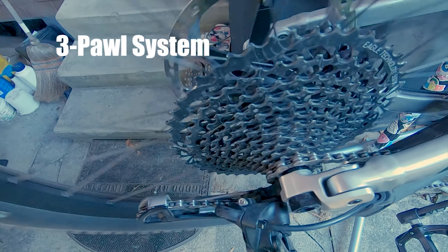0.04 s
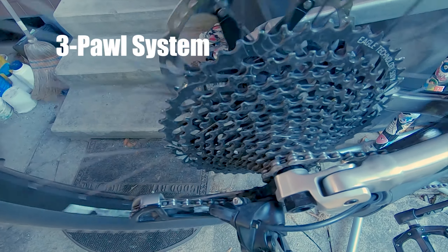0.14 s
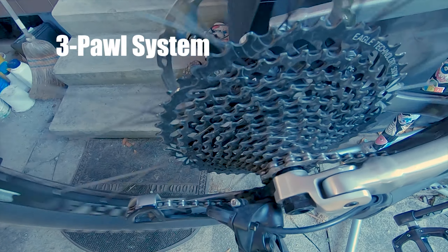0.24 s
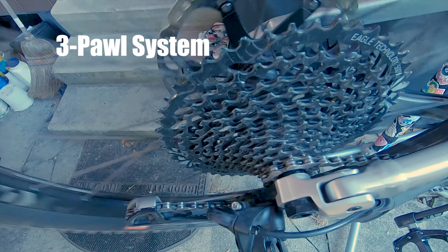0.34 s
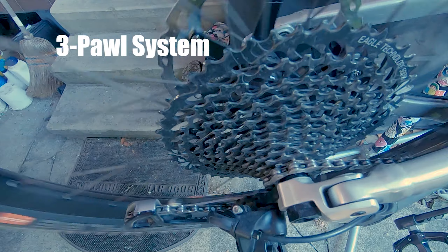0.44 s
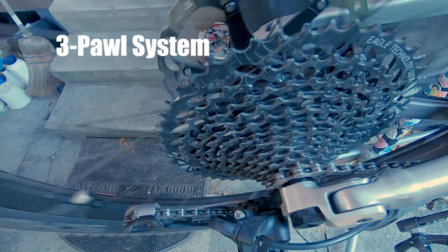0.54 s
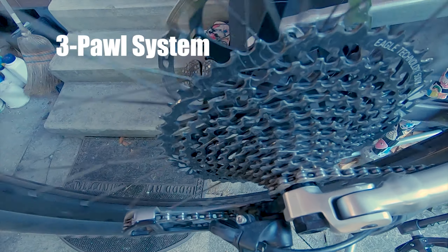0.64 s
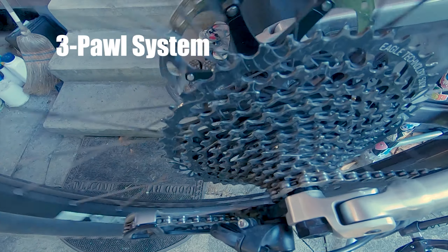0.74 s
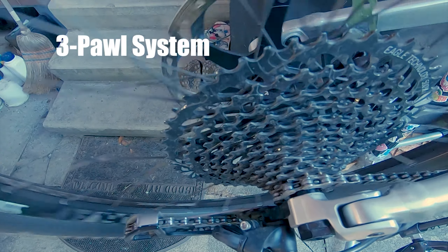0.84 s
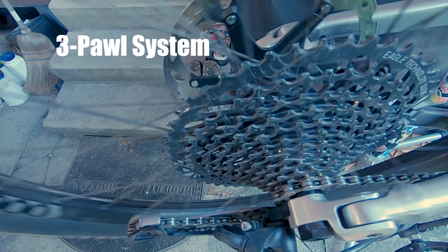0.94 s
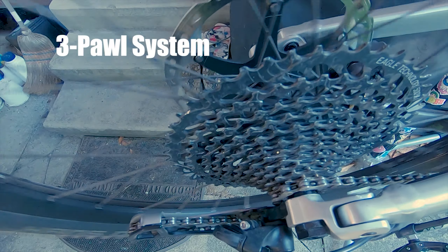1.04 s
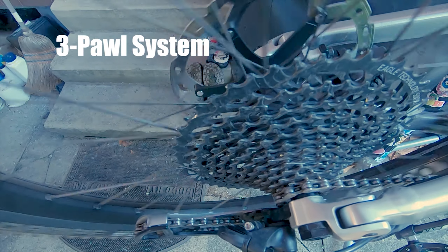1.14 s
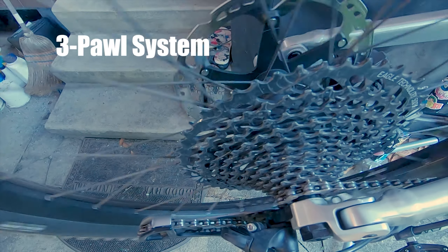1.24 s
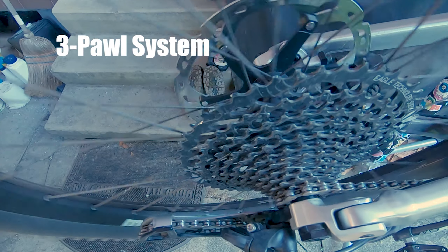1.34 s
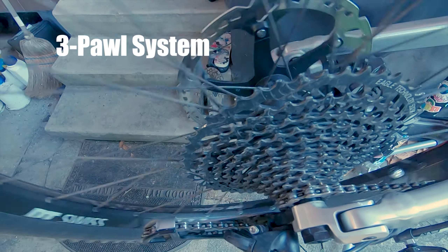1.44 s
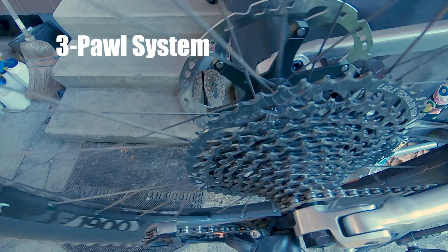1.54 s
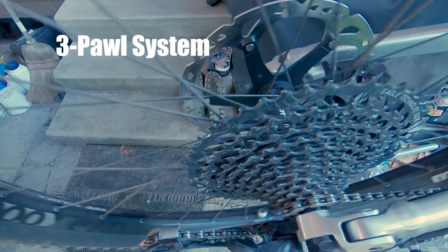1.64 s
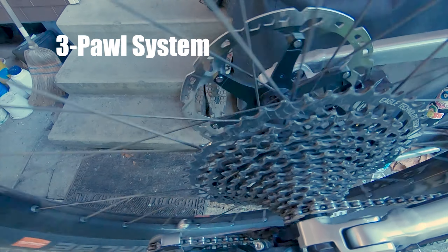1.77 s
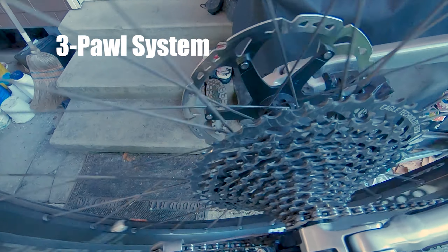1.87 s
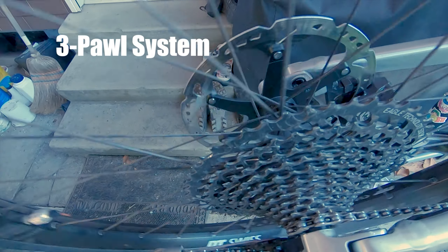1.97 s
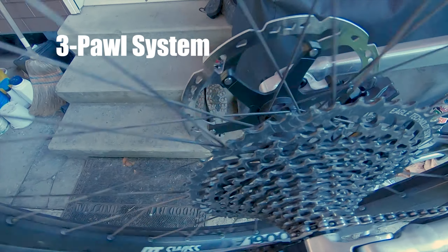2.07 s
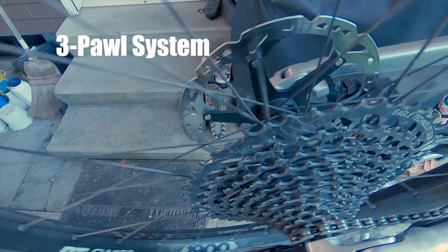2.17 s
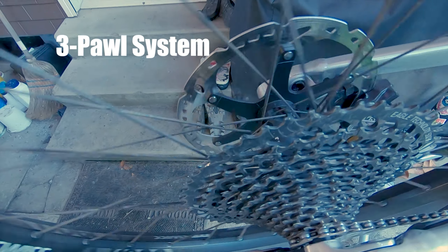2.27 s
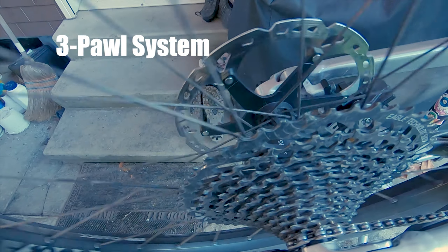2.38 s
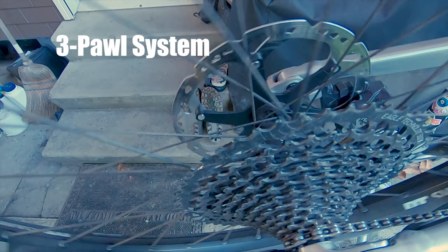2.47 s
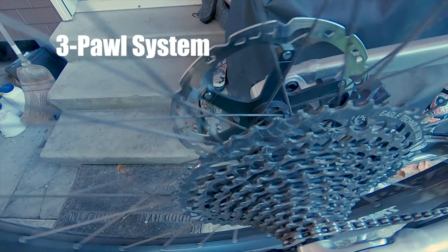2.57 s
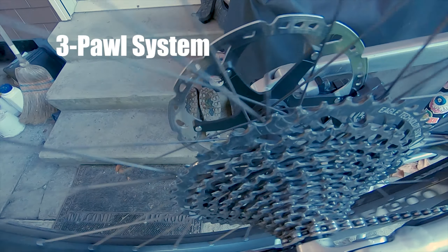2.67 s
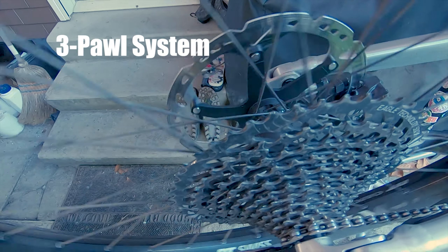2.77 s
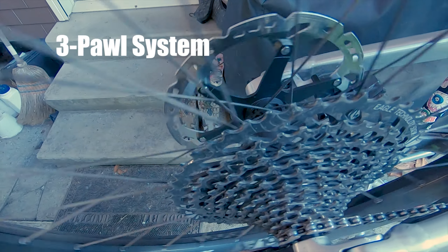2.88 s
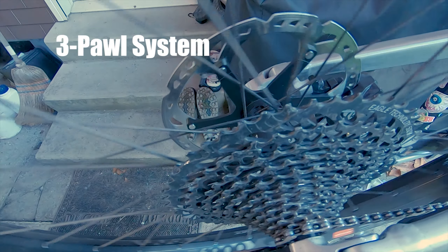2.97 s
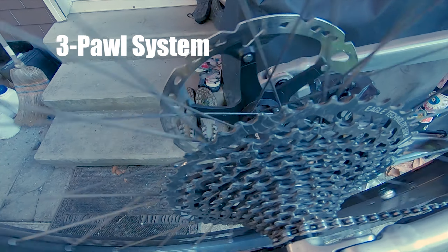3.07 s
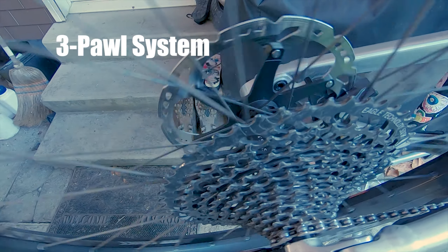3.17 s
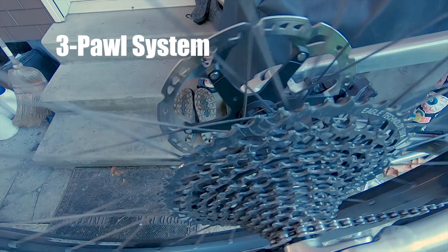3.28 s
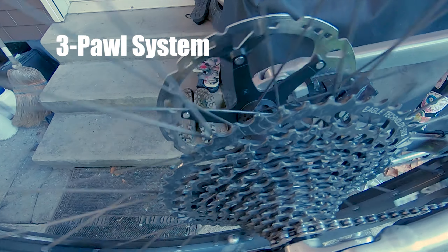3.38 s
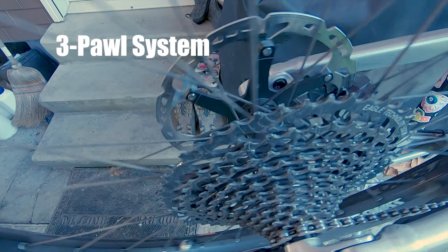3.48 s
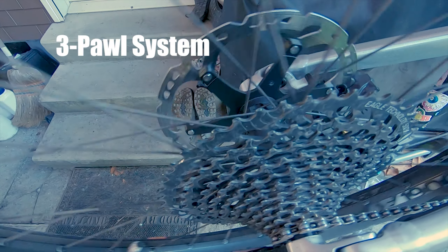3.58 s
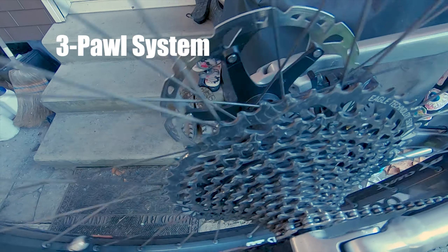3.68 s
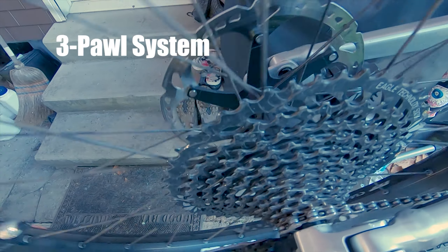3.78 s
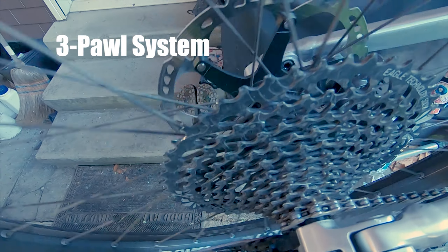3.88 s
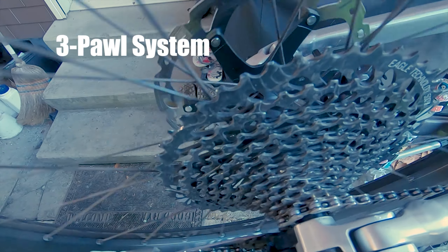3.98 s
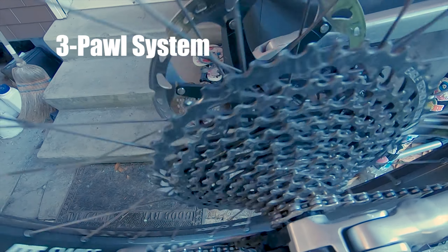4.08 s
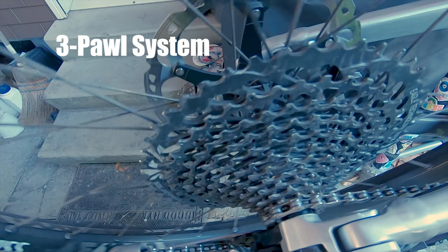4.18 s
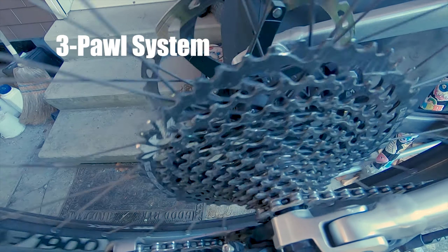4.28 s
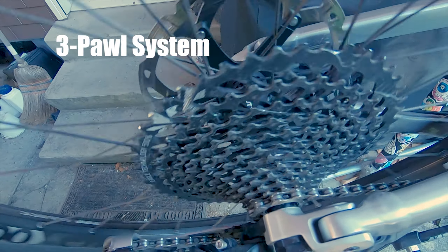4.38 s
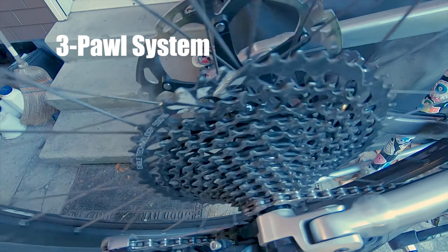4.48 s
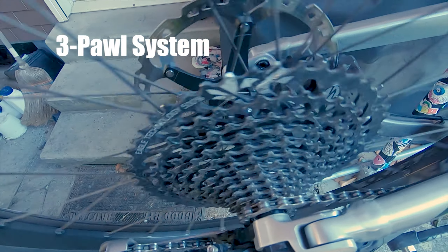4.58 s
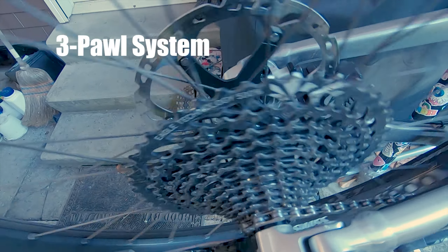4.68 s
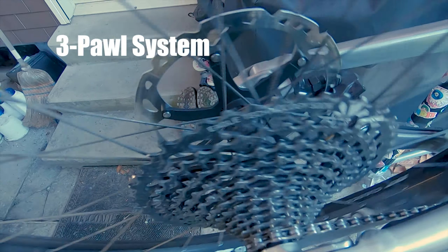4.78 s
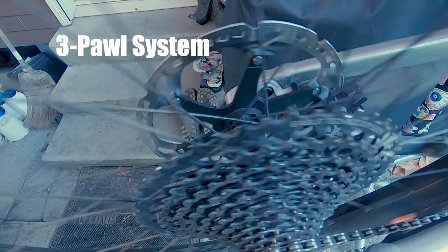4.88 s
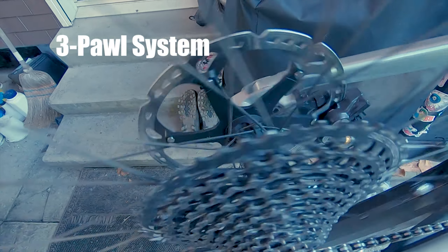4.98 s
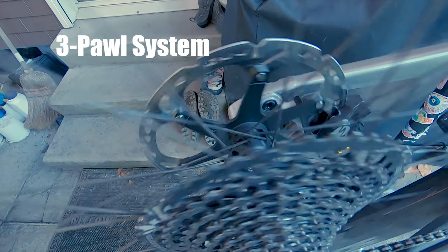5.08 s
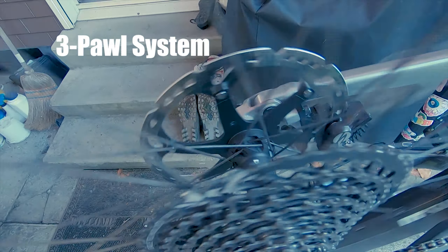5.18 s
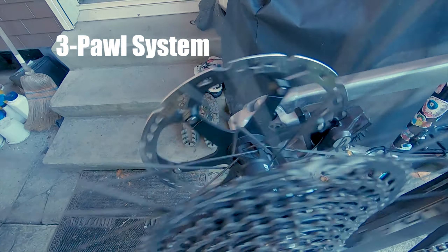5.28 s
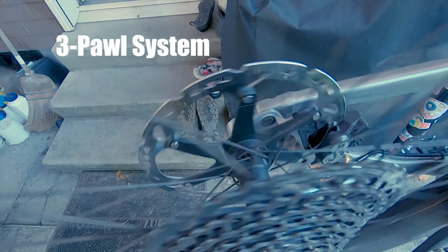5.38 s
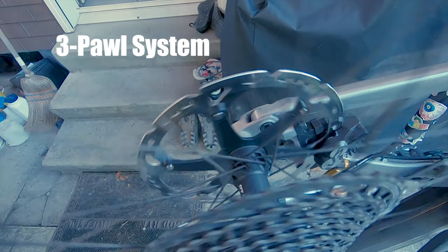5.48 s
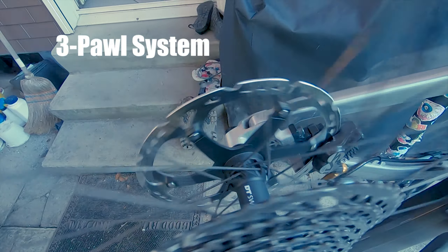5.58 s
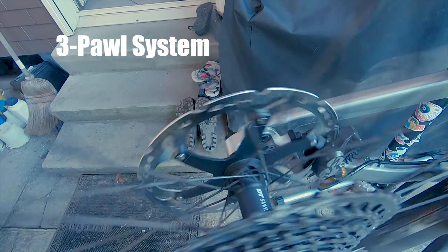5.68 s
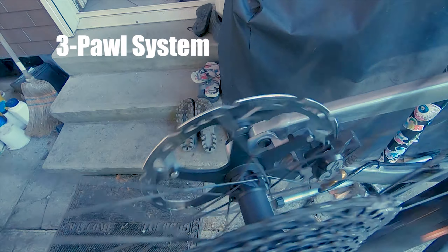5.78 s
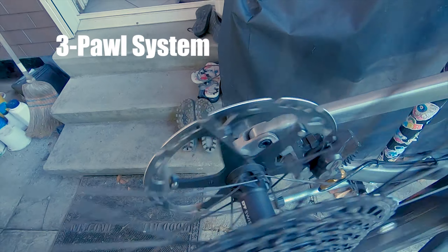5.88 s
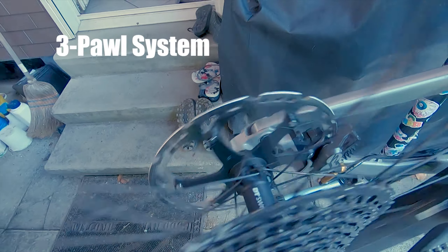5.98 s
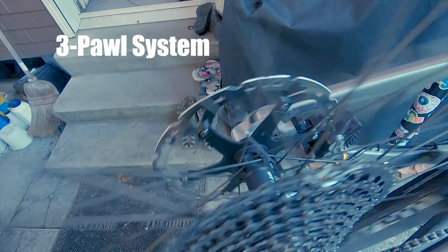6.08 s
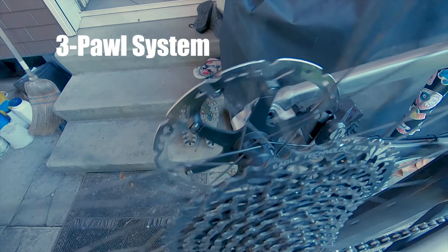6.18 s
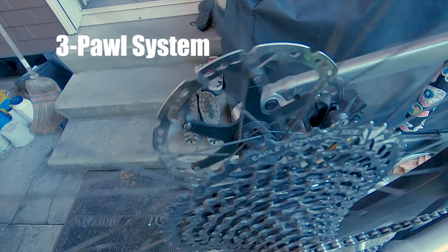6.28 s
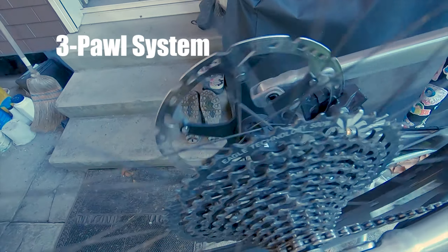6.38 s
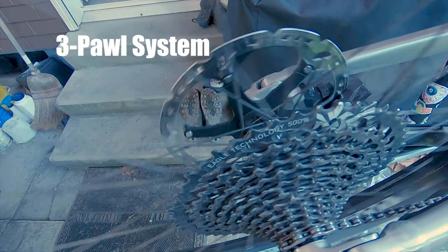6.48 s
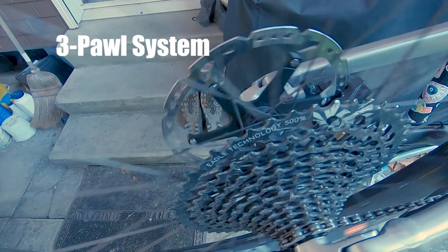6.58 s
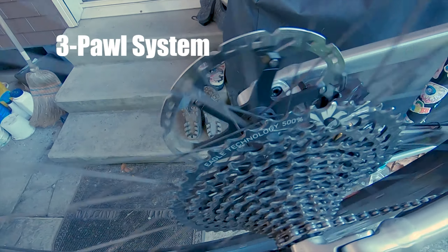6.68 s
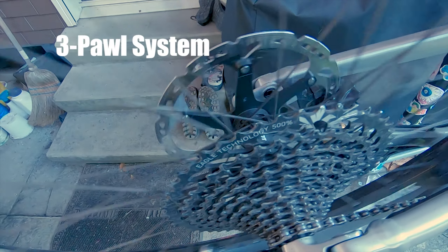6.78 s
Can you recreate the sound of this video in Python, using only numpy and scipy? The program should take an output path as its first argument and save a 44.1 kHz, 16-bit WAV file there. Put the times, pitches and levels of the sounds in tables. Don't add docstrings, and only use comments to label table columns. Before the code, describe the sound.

Sharp, bright freewheel clicks dominate, each with a short steely ring, slowing evenly until they cease. Boxy knocks, squeezes and a wind bump intrude between one and two seconds. After the stop there is a quiet stretch of soft creak, irregular chain-link clinks and faint hum, growing busier before the wheel spins again in a quicker buzz. Very close, dry outdoor pickup, slightly overloaded on the sharpest peaks.

```python
import sys
import numpy as np
from scipy import signal
from scipy.fft import rfft, irfft
from scipy.io import wavfile
from scipy.ndimage import uniform_filter1d

SR = 44100
rng = np.random.default_rng(int(sys.argv[2]) if len(sys.argv) > 2 else 0)


def field_ratio(decibels):
    return 10 ** (np.asarray(decibels, dtype=float) / 20)


def put_to_file(sound):
    columns = np.atleast_2d(sound).T
    safe = np.clip(columns, -1, 1)
    whole_steps = np.round(safe * 32767)
    wavfile.write(sys.argv[1], SR, whole_steps.astype(np.int16))


N = 301203
t = np.arange(N) / SR

# pitch_hz, level_db (per Hz)
SHIMMER_SHAPE = [(530, -38), (900, -26.5), (1800, -16.5), (2030, -15), (2790, -7), (3350, -3), (4430, -12),
                 (4830, -1), (5650, -10.5), (6080, -10.5), (7210, -6), (7850, -6.5), (9090, -3),
                 (15700, -10.5), (16800, -40)]


def unit(x):
    return x / np.sqrt(np.mean(x ** 2, axis=-1, keepdims=True))


def curve(table):
    s, first, *rest = np.transpose(table)
    level = np.interp(t, s, first, left=-120, right=-120)
    return [level] + [np.interp(t, s, c) for c in rest]


def colour(x, shape):
    hz, db = np.transpose(shape)
    f = np.fft.rfftfreq(x.shape[-1], 1 / SR) + 1
    gain = field_ratio(np.interp(np.log(f), np.log(hz), db))
    return irfft(rfft(x) * gain, x.shape[-1])


def band(lo_hz, hi_hz):
    sos = signal.butter(2, [lo_hz, hi_hz], "bandpass", fs=SR, output="sos")
    return unit(signal.sosfilt(sos, rng.standard_normal(N)))


def walk(rate):
    k = int(SR / rate)
    steps = np.repeat(rng.standard_normal(N // k + 1), k)
    return unit(uniform_filter1d(steps, k)[:N])


def add(track, s, sound):
    i = int(s * SR)
    part = sound[max(-i, 0):len(track) - i]
    track[max(i, 0):max(i, 0) + len(part)] += part


def fade(u, t60):
    return np.exp(-np.log(1000) * u / t60)


def duck(s):
    knock_s, drop_db, hold_s, recover_s = 1.159, -9.5, 0.25, 0.27
    return drop_db * (s > knock_s) * np.clip(1 - (s - knock_s - hold_s) / recover_s, 0, 1)


def teeth(start, gaps):
    tooth, ms = np.transpose(gaps)
    each_gap_ms = np.interp(np.arange(1, tooth[-1] + 1), tooth, ms)
    return start + np.r_[0, np.cumsum(each_gap_ms)] / 1000


def ratchet():
    # tooth_passed, gap_ms (since the last tooth)
    coast_gaps = [(1, 39.47), (2, 36.83), (7, 45.52), (10, 41.7), (13, 50.27), (28, 55.58), (34, 59.71),
                  (39, 64.72), (54, 72.56), (66, 91.61), (67, 115.27)]
    respin_gaps = [(1, 32.15), (2, 25.61), (8, 24.46), (11, 26.55), (16, 34.02), (18, 32.27)]
    # start_s, snap_db, spread_db (bands beside the 4.4 kHz strike)
    facing = [(0, 2.5, 2), (.3, 1, 7), (.55, 1.5, 4), (.83, 3, 10), (1.1, 1.5, 3), (1.75, 0.5, 5.5),
              (2.07, 3, -15.5), (2.35, 3, 1.5), (2.7, 3, -5), (3.3, 2.5, -1.5), (3.5, 3, -2.5),
              (4.1, 5.5, -6), (6.3, 7, -1.5), (6.42, 1.5, -1), (6.52, -1, -2), (6.62, -1.5, 2),
              (6.699, 0, -4), (6.83, -2.5, -6)]
    spread_share = [0.92, 0.45, 0.28]
    snap_scatter_db, spread_scatter_db, band_scatter_db = 0.17, 4.5, -1
    s = np.r_[teeth(-.033, coast_gaps), teeth(6.2961, respin_gaps)]
    at, db, spread = np.transpose(facing)
    chance = rng.standard_normal((len(s), 5))
    tint = np.outer(np.interp(s, at, spread), spread_share)
    tint += spread_scatter_db * chance[:, [1]] + band_scatter_db * chance[:, 2:]
    return np.c_[s, np.interp(s, at, db) + snap_scatter_db * chance[:, 0], tint]


def blows(u, count):
    # pitch_hz, level_db, t60_s
    blow_modes = [(4226, 15.5, 0.0093), (4552, 19, 0.0053), (8800, -35, 0.024), (11090, 16.5, 0.0069),
                  (2845, 1, 0.018), (1130, -8, 0.0026), (450, -11, 0.0043)]
    hz, db, t60 = np.transpose(blow_modes)[:, :, None]
    chance = rng.standard_normal((count, 3, len(blow_modes), 1))
    size, turn, shift = chance.transpose(1, 0, 2, 3)
    wave = np.sin(2 * np.pi * hz * (1 + 0.017 * shift) * u + 2 * turn)
    return np.sum(field_ratio(db + 2.5 * size) * fade(u, t60) * wave, axis=1)


def rings(u, count, scatter_db, twin_db, twin_hz, crowd_db):
    hub_hz = [2436, 2796, 2875, 3548, 3714, 3878, 4025, 4360, 4420, 4560, 4955, 5093, 5249, 5518]
    rim_hz = [6900, 7222, 7330, 7412, 8260, 8830, 9093, 9342, 9920, 10880, 11540, 12745, 13390, 15060]
    # level_db, t60_s
    mode_levels = [(-7, 0.15), (-8.5, 0.33), (-23, 0.99), (-0.5, 0.034), (-12, 0.37), (-21, 0.57),
                   (-39.5, 0.15), (-2.5, 0.17), (-8, 0.16), (6, 0.052), (-9, 0.33), (-11, 0.41),
                   (-41, 0.25), (-2.5, 0.23), (-11, 0.21), (-24.5, 0.39), (-24, 0.99), (-18.5, 1),
                   (-7, 0.076), (-58, 0.15), (-3.5, 0.07), (-3, 0.17), (-11, 0.06), (7.5, 0.028),
                   (3, 0.089), (0.5, 0.053), (-45, .12), (-20, 0.21)]
    # pitch_hz, level_db
    late_tilt = [(3000, -1.5), (6000, -5), (11000, -5), (16000, -17)]
    hz, (db, t60) = np.array(hub_hz + rim_hz), np.transpose(mode_levels)
    crowd = rng.uniform(1500, 15800, 300)
    for shape in (SHIMMER_SHAPE, late_tilt):
        shape_hz, shape_db = np.transpose(shape)
        crowd_db = crowd_db + np.interp(np.log(crowd), np.log(shape_hz), shape_db)
    crowd_t60 = 0.19 * field_ratio(0.28 * rng.standard_normal(len(crowd)))
    hz = np.concatenate([hz, hz + twin_hz * rng.standard_normal(len(hz)), crowd])
    db = np.concatenate([db, db + twin_db, crowd_db])
    t60 = np.concatenate([t60, t60, crowd_t60])
    size, turn = rng.standard_normal((count, len(hz), 2)).transpose(2, 0, 1)
    ring = fade(u, t60[:, None]) * np.exp(2j * np.pi * hz[:, None] * u)
    waver = np.resize(np.exp(.9j * walk(70)), (count, len(u)))
    strike = field_ratio(db + scatter_db * size) * np.exp(2j * turn)
    return ((strike @ ring) * waver).imag


def snaps(table, ring_db, over_db, rise_s, t60):
    tint_hz = [1300, 2700, 4400, 5600, 10000]
    rows, u = np.array(table), np.arange(8192) / SR
    shimmer = unit(colour(rng.standard_normal((len(rows), len(u))), SHIMMER_SHAPE))
    body = field_ratio(8.5) * shimmer * fade(u, 0.026)
    body += field_ratio(ring_db) * rings(u, len(rows), scatter_db=3.5, twin_db=-1, twin_hz=36.3, crowd_db=-5.5)
    body[:, :1024] += blows(u[:1024], len(rows))
    body *= fade(u, t60) * (1 - np.exp(-u / rise_s)) ** 2
    body *= np.clip((u[-1] - u) / 0.054, 0, 1)
    out = np.zeros(N)
    for (s, db, low, mid, high), one, (lag, weak) in zip(rows, body, rng.random((len(rows), 2))):
        one = colour(one, list(zip(tint_hz, (0, low, 0, mid, high))))
        add(one, .001 + .004 * lag, field_ratio(-6.5 - 9.3 * weak) * one[:4096].copy())
        add(out, s, field_ratio(db + over_db - 10) * one / np.std(one[:512]))
    return out


def breeze():
    # peak_s, level_db, length_s
    gust_events = [(0.712, -40, 0.046), (1.21, -47, 0.03), (1.47, -13, 0.026), (1.623, -22, 0.066),
                   (1.858, -27, 0.036), (1.79, -24, 0.066), (2.05, -29.5, 0.15), (2.66, -41, .15),
                   (3.973, -27, .2), (4.34, -34, 0.16), (4.845, -30, 0.2), (5.217, -27.5, 0.096),
                   (5.5, -28.5, 0.07), (5.802, -29, 0.09), (6.12, -27.5, 0.17), (6.388, -21.5, .07)]
    rumble = [(5, -6), (12, 3), (19.4, 0), (45, -12), (90, -24), (250, -50), (2500, -95)]
    wind = unit(colour(rng.standard_normal(N), rumble))
    gusts = field_ratio(-34 + 0 * walk(10))
    gusts = gusts + sum(field_ratio(db) * np.exp(-((t - s) / length) ** 2) for s, db, length in gust_events)
    return gusts * field_ratio(duck(t) / 2) * wind


def yard_noise():
    # pitch_hz, level_db (per Hz)
    yard_shape = [(35, -24), (60, -8), (113, -3.5), (175, -8.5), (550, -16.5), (940, -17.5), (1530, -20),
                  (1890, -21.5), (2950, -28), (4380, -27.5), (6220, -38), (9460, -37), (15800, -88)]
    # start_s, level_db
    yard_levels = [(0, -47), (1.15, -46), (1.65, -44.5), (1.84, -50), (2.11, -53.5), (2.34, -52),
                   (3.8, -48), (4.09, -49.5), (4.28, -45.5), (6.18, -43.5), (6.37, -50), (6.83, -56)]
    yard = colour(rng.standard_normal(N), yard_shape)
    yard /= np.std(colour(yard, [(250, -60), (300, 0), (1500, 0), (1800, -60)]))
    hiss = field_ratio(-53 + duck(t)) * band(5100, 14700)
    return hiss + field_ratio(curve(yard_levels)[0] + duck(t)) * yard


def far_motor():
    # multiple, level_db
    motor_tones = [(2, -7), (3, 0), (4, -8), (6, -14), (8, -18)]
    # start_s, level_db
    motor_levels = [
        (0, -56),
        (1.3, -56),
        (3.8, -54),
        (4.35, -37),
        (5.3, -36),
        (6.25, -37),
        (6.4, -56),
        (6.83, -60),
    ]
    turn = 2 * np.pi * np.cumsum(34.6 * (1 + .004 * walk(4))) / SR
    motor = sum(field_ratio(db + .7 * walk(6)) * np.sin(k * turn) for k, db in motor_tones)
    return field_ratio(curve(motor_levels)[0]) * motor


def creaks():
    # start_s, length_s, pitch_hz, level_db
    creak_events = [
        (2.018, 0.063, 237, -23.5),
        (2.011, 0.044, 520, -25),
        (4.233, 0.188, 280.6, -40),
        (4.235, 0.322, 535, -43),
        (4.23, 0.27, 450, -45),
        (1.515, 0.19, 8.6, -11.5),
        (0.74, 0.067, 14, -18),
        (1.9, 0.65, 140, -46.5),
    ]
    out = np.zeros(N)
    for s, length, hz, db in creak_events:
        u = np.arange(int(length * SR)) / SR
        swell = np.clip(u / 0.0055, 0, 1) * np.clip((length - u) / 0.025, 0, 1)
        level = field_ratio(db + 3.6 * walk(39.6)[:len(u)])
        wobble = 0.43 * min(hz / 300, 1) * walk(49.5)[:len(u)]
        add(out, s, -level * swell * np.sin(2 * np.pi * hz * u + wobble))
    return out


def knocks():
    # start_s, level_db, first_hz, last_hz, t60_s
    tap_events = [
        (1.18, 11.5, 1190, 107, 0.042),
        (1.364, -15.5, 890, 278, 0.042),
        (1.428, -5.5, 736, 177, 0.028),
        (1.861, 3.5, 330, 217, 0.017),
        (1.751, -19, 300, 180, 0.047),
        (1.819, -17.5, 294, 140, 0.095),
    ]
    thump_events = [
        (1.2653, 17, 440, 316, 0.022),
        (1.266, 7, 870, 650, 0.022),
        (1.267, -5, 200, 134, 0.053),
        (1.8538, 24, 580, 459, 0.012),
    ]
    out, u = np.zeros(N), np.arange(4096) / SR
    taps = [(*k, 0.00099, 0.00239) for k in tap_events]
    thumps = [(*k, 0.0038, 0.0016) for k in thump_events]
    for s, db, first, last, t60, press, fall in taps + thumps:
        phase = 2 * np.pi * np.cumsum(last + (first - last) * np.exp(-u / fall)) / SR
        push = (1 - np.exp(-u / press)) ** 2 * fade(u, t60)
        add(out, s, field_ratio(db) * push * (np.sin(phase) + 0.045 * np.sin(1.8 * phase)))
    return out


def rub():
    # peak_s, level_db, swell_s, fade_s, rasp_db
    strokes = [(1.23, -32.5, 0.042, 0.016, -29), (1.254, -26, 0.012, 0.011, -31),
               (1.378, -25.5, 0.0062, 0.033, -17), (1.44, -22, .004, 0.021, -25),
               (1.546, -20, 0.072, 0.053, -11), (1.605, -27.5, 0.013, 0.24, -38),
               (1.755, -31.5, 0.021, 0.1, -30), (1.9, -65, .03, .15, -18), (2.033, -31, 0.03, 0.031, -31),
               (4.229, -32.5, 0.005, 0.045, -3), (4.865, -42, 0.018, 0.064, -1.5)]
    slips = field_ratio(2.2 * walk(150))
    drone = unit(colour(slips * band(140, 740), [(700, 0), (900, -12)]))
    rasp = unit(slips * band(900, 2000))
    out = np.zeros(N)
    for s, db, swell, release, rasp_db in strokes:
        fall_db = 21.5 * np.maximum((s - t) / swell, (t - s) / release)
        out += field_ratio(db - fall_db) * (drone + field_ratio(rasp_db) * rasp)
    return out


def chain():
    # start_s, level_db
    chain_levels = [
        (4.2, -47),
        (4.24, -46),
        (4.41, -55),
        (4.67, -53),
        (5.19, -49.5),
        (5.75, -50.5),
        (5.99, -48.5),
        (6.13, -46),
        (6.29, -51),
    ]
    # pitch_hz, level_db
    rattle_shape = [(1200, -23), (2500, -4), (4400, 3), (5600, -4)]
    rattle_top = [(7000, -24), (9000, -50)]
    rattle = rng.standard_normal(N) * field_ratio(1.5 * walk(60))
    return field_ratio(curve(chain_levels)[0]) * unit(colour(rattle, rattle_shape + rattle_top))


def links():
    # start_s, peak_db, spread_db
    link_events = [(4.4318, -30, -4), (4.4443, -25.5, -12), (4.682, -28, -5), (4.8463, -24, -3),
                   (4.86, -16.5, -1), (4.871, -24, -2), (4.883, -24, -1), (4.229, -24, -2),
                   (5.0075, -26, -6), (5.091, -25, -13), (5.1487, -31, 1), (5.256, -25, 0), (5.29, -29, 1),
                   (5.3697, -34, 1), (5.441, -21.5, 0), (5.4973, -25, -9), (5.527, -25, -6),
                   (5.611, -26, 1), (5.6967, -16, 0), (5.7736, -18.5, 2), (5.806, -19.5, -7),
                   (5.8567, -10.5, -0.5), (5.926, -24, -9), (6.0086, -17.5, -0.5), (6.081, -22.5, 2),
                   (6.1636, -24.5, 3), (6.2263, -21, 3)]
    link_share = [0.11, 1, 2.4]
    s, db, spread = np.transpose(link_events)
    return np.c_[s, db, np.outer(spread, link_share) + [3.5, 0, -3.5]]


def scene():
    hub = snaps(ratchet(), ring_db=-8.5, over_db=-5.5, rise_s=0.00042, t60=2.3) * field_ratio(duck(t))
    seating = snaps(links(), ring_db=-8, over_db=-7.5, rise_s=0.002, t60=.11)
    surroundings = breeze() + yard_noise() + far_motor()
    mid = hub + surroundings + creaks() + knocks() + rub() + chain() + seating
    flutter = [(100, -4), (500, -7), (1000, 5), (2000, 0), (6000, 0), (12000, 5)]
    side = field_ratio(-30) * colour(mid * walk(300), flutter)
    return np.array([mid + side, mid - side])


def low_pass(x):
    return signal.sosfilt(signal.butter(12, 16820, fs=SR, output="sos"), x)


def record(dry):
    top_cut = signal.ellip(12, .3, 70, 15800, fs=SR, output="sos")
    dull = signal.sosfilt(top_cut, dry)
    return low_pass(np.clip(dull, -.98, .98))


dry = scene()
out = record(dry)
put_to_file(out)
```